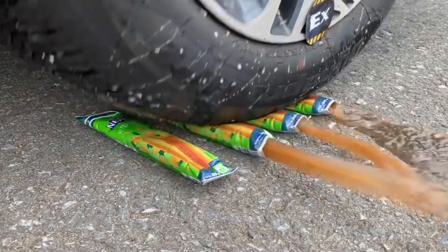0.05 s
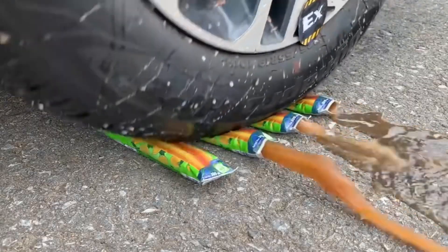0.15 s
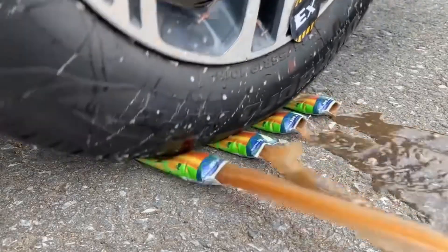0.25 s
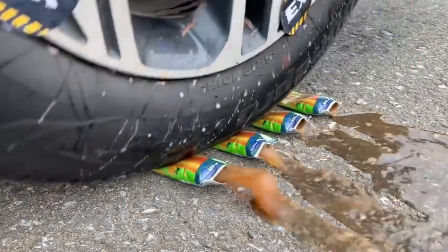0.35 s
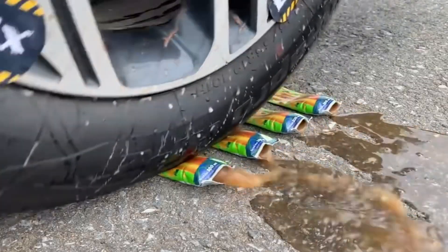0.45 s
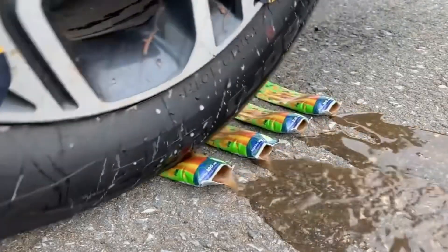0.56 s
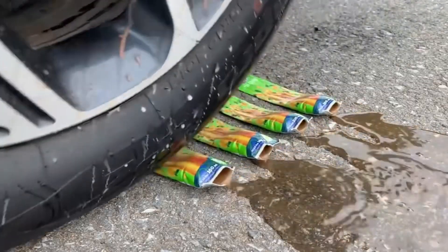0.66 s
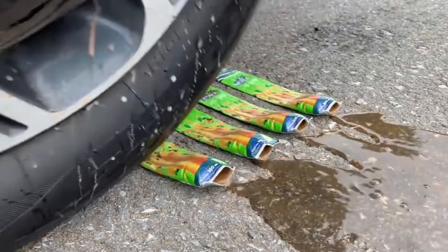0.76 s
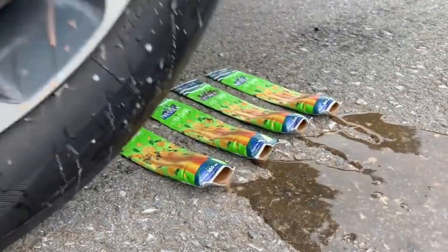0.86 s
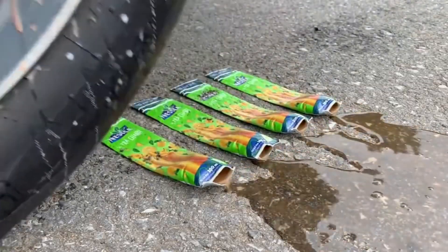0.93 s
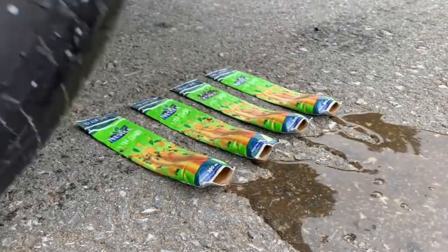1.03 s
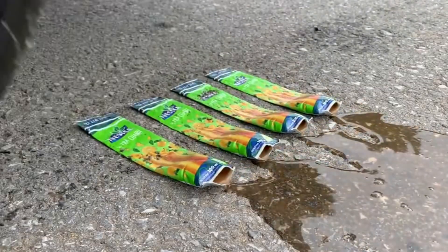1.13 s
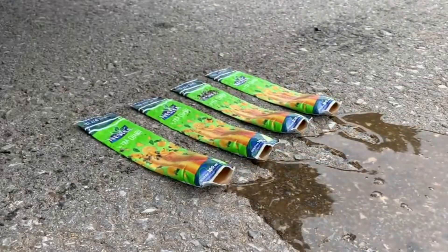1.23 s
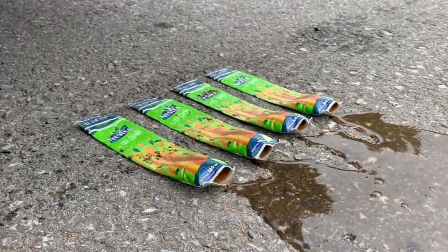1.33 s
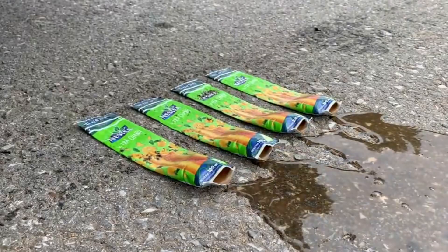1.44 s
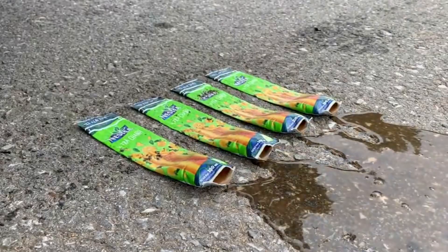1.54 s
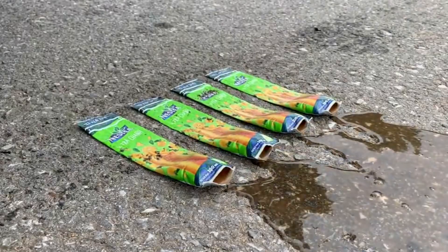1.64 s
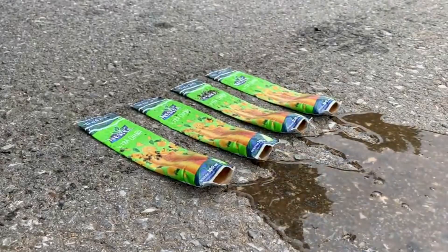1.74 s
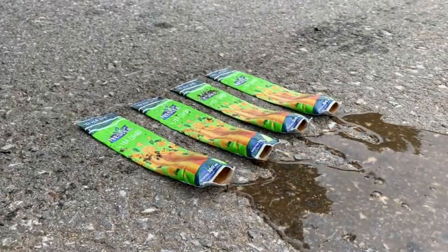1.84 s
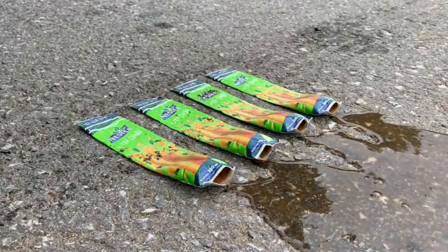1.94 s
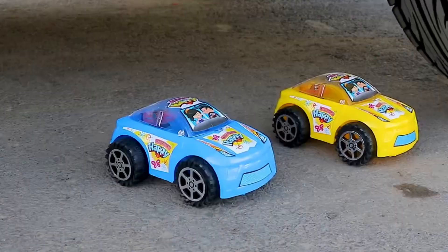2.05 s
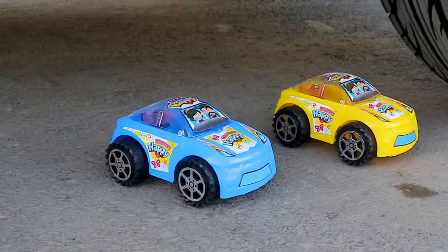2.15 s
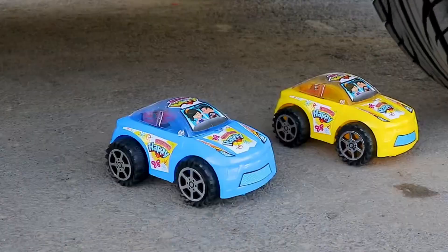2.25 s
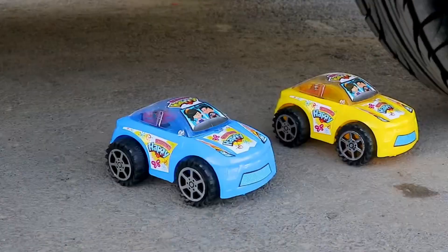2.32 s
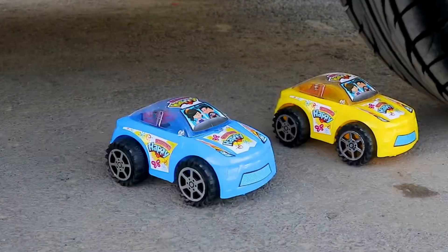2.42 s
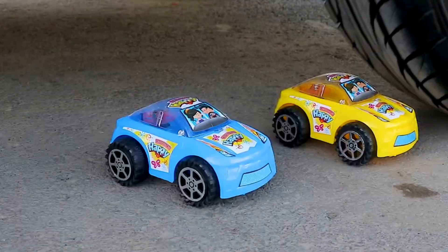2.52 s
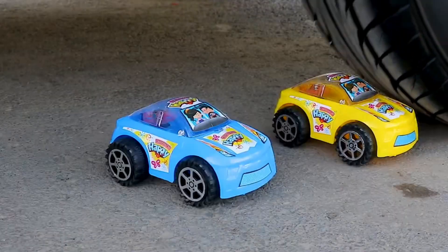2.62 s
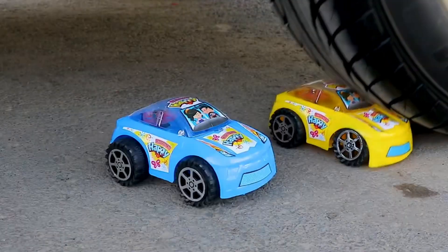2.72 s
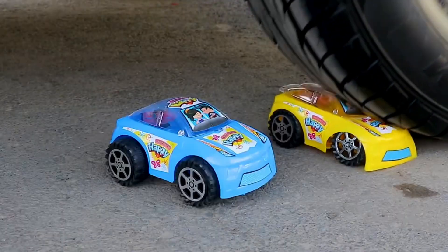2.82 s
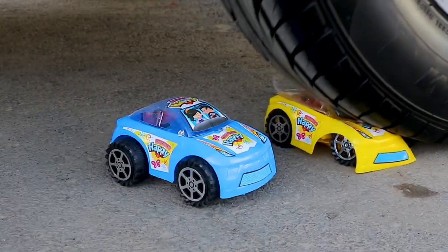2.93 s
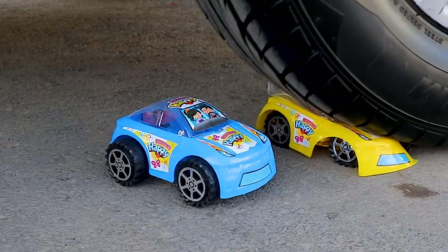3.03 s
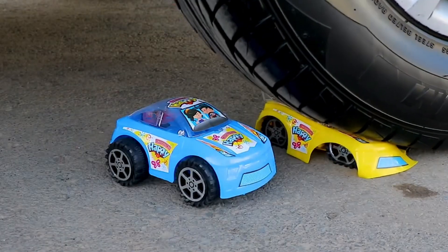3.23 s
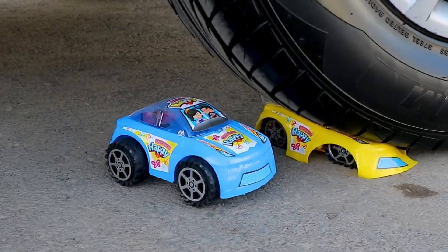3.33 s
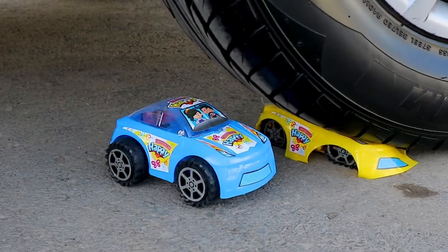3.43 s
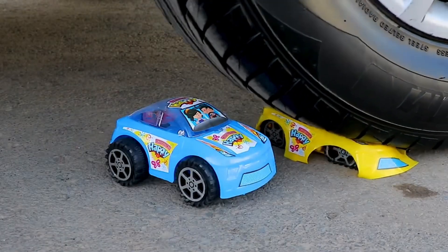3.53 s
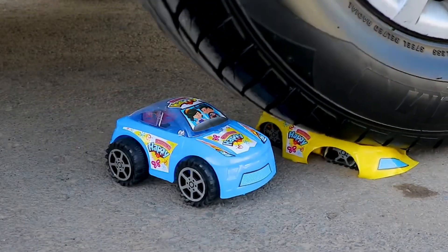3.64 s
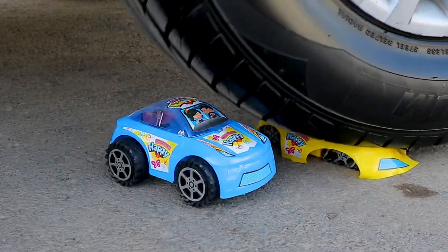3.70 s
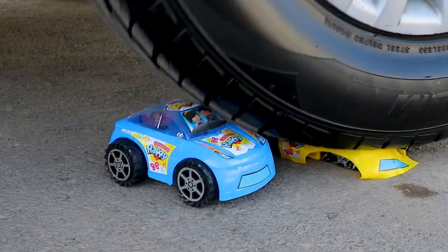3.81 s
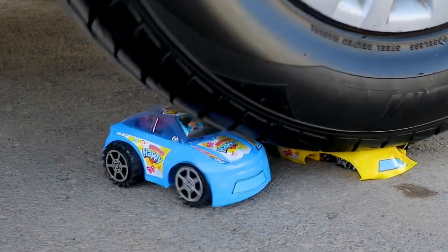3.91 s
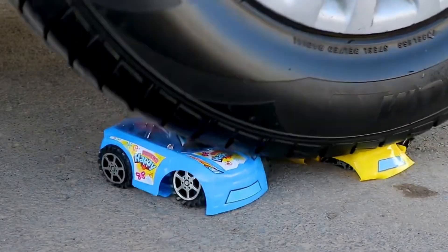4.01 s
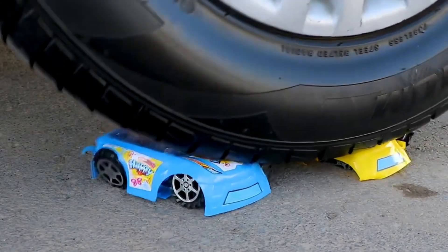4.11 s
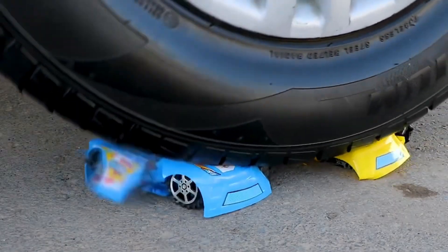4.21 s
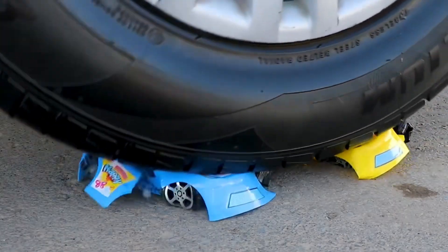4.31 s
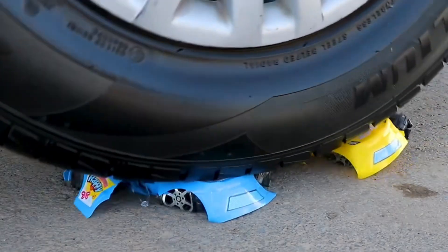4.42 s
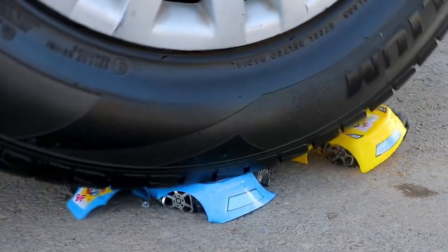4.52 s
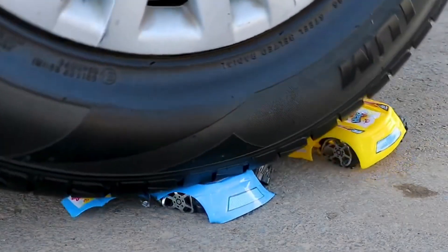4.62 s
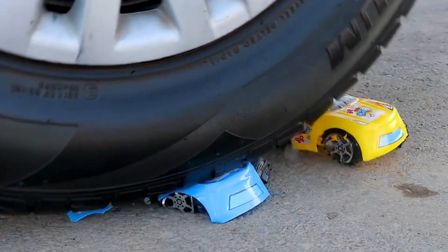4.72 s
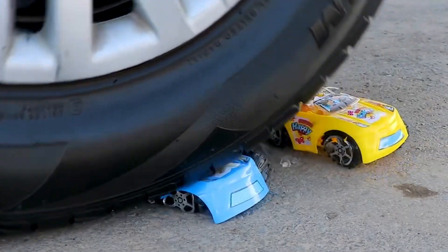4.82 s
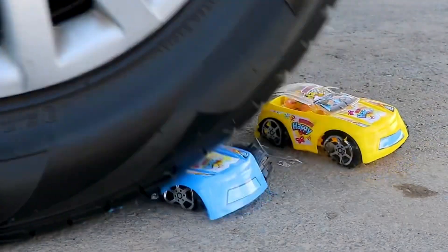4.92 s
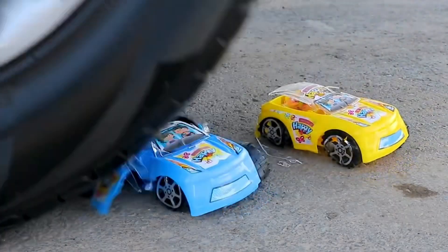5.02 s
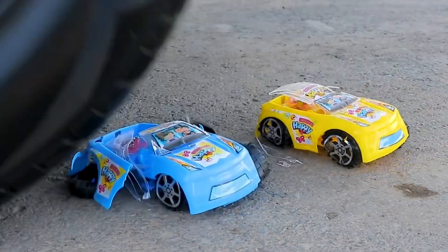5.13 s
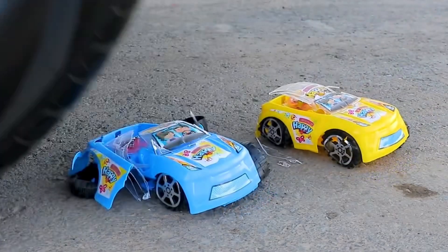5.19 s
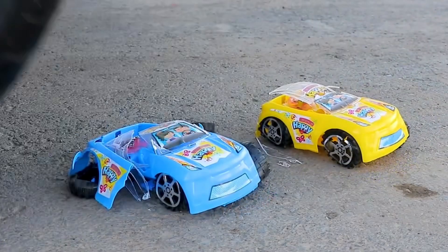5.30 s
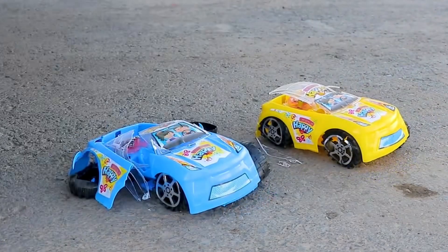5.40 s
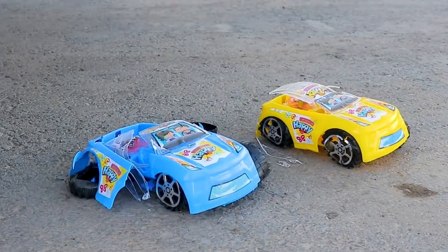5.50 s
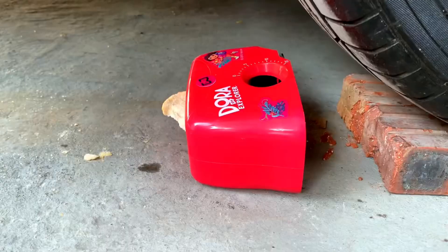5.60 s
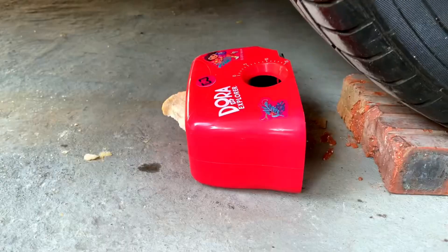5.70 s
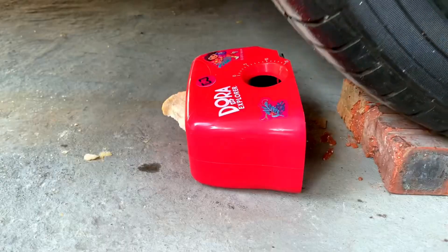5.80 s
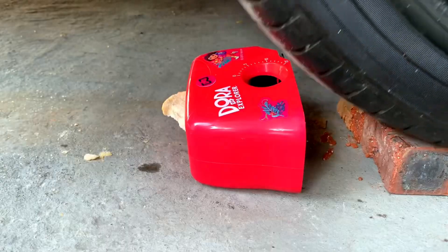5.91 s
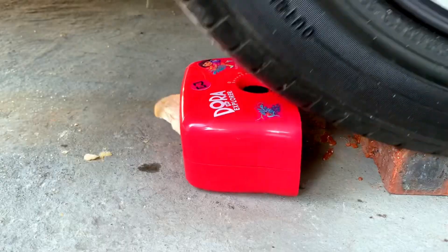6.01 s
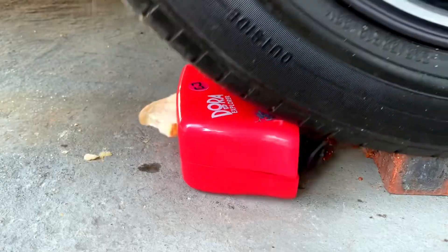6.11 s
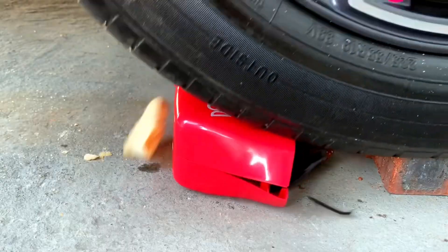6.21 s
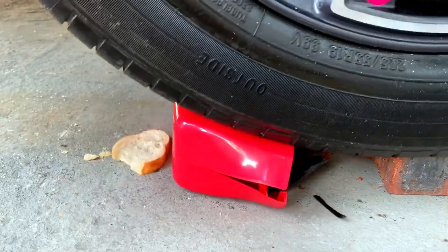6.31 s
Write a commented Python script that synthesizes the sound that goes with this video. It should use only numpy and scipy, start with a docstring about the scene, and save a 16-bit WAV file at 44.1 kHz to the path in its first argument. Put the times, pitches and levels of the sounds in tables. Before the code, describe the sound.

Foil pouches snap and squirt under a rolling tyre, then plastic toys and a thicker box crunch in bouts while an engine idles.

```python
"""A car tyre crushes things

Three short scenes of a slowly rolling tyre, joined by hard cuts, with an idling engine behind.
On a street, foil drink pouches snap, burst and spray. In a yard, two hollow plastic toys crack one
after the other, in mono. In a garage, a thicker plastic box crunches. Each split in the plastic is
a burst of noise that makes the shell ring; many tiny splits together make the crunch."""
import sys
import numpy as np
from scipy import signal
from scipy.io import wavfile
from scipy.ndimage import uniform_filter1d

SR = 44100
rng = np.random.default_rng(int(sys.argv[2]) if len(sys.argv) > 2 else 0)


def log_audio(samples):
    """Write samples as a 16-bit WAV file to the path given in sys.argv[1]."""
    # one column per channel
    frames = np.atleast_2d(samples).T
    # limit to full scale, then quantise
    limited = np.clip(frames, -1, 1)
    pcm = np.round(limited * 32767).astype(np.int16)
    wavfile.write(sys.argv[1], SR, pcm)


N = 280035
GARAGE_START_S = 5.606

# street air with the engine's rumble: f/Hz, relative level/dB
STREET_SPECTRUM = [(25, -15.5), (69, 7), (140, -12.5), (220, -10), (400, -22), (1300, -30), (2200, -29.5),
                   (9000, -52), (15000, -65)]
# cracks of the toys, then of the box: t/s, split level/dB, ring level/dB (both relative)
CRACK_EVENTS = [(2.7671, -2.5, -14.5), (2.7784, 4, -7), (2.818, -11, -22), (2.8275, 4, -22),
                (2.8413, 1.5, -20), (2.871, 6, -10), (2.9096, 1, -18.5), (2.9223, 8, -8),
                (3.0101, -3.5, -19.5), (3.026, -3, -20.5), (3.0705, 5.5, -14), (3.1002, 2, -21.5),
                (3.1192, -1, -16.5), (3.1597, 0, -21.5), (3.1839, -1.5, -12.5), (3.2043, -1.5, -15),
                (3.2506, 0.5, -14.5), (3.384, -7, -56), (3.3965, -9, -23), (3.468, -18.5, -38),
                (3.484, -18, -59), (3.5005, -9.5, -41), (3.5099, -5.5, -55), (3.557, -16.5, -49),
                (3.5735, -9, -28.5), (3.6064, 2.5, -10), (3.6284, -2.5, -11.5), (3.7333, 2, -16.5),
                (3.78, -11, -31.5), (3.8017, -1.5, -13), (3.8258, -1, -15), (3.8552, -3.5, -30),
                (3.8738, 2, -11.5), (3.9362, 5, -9.5), (3.9551, -1, -6), (3.9814, 1, -13),
                (3.9944, 0, -4.5), (4.0196, -5, -15), (4.0562, 6, -9.5), (4.066, 5.5, -6.5),
                (4.084, 4, -11), (4.113, -4, -23.5), (4.126, 4.5, -10), (4.138, -3, -17), (4.1603, -3, -18),
                (4.1764, 2.5, -8), (4.1876, 5, -8.5), (4.251, -3.5, -18.5), (4.2628, 9.5, -11.5),
                (4.2885, 0.5, -10.5), (4.321, -7.5, -26), (4.381, -0.5, -15), (4.403, -10, -26),
                (4.4392, -1.5, -10), (4.466, -2.5, -17), (4.6019, 2, -9.5), (4.6455, -7, -14),
                (4.7115, -17, -24), (4.7188, -5, -16.5), (4.7812, -12, -24.5), (4.806, -6.5, -20),
                (4.8384, -5, -10), (4.8489, 0, -12.5), (4.8947, -1, -13.5), (4.9006, 0.5, -18),
                (4.945, -6, -22), (4.9809, -3, -29.5), (6.0124, -27, -15), (6.0383, -4, -15),
                (6.1145, -1, -12), (6.1673, 4.5, -16.5), (6.2756, 2.5, -23)]
# a shell gives way and crunches until flat: t/s, relative level/dB, fall/(dB per s), end/s
CAVE_INS = [(2.775, -12.5, 102, 2.94), (2.94, -14.5, 19, 2.985), (3.03, -24, 30, 3.17),
            (3.89, -29.5, 6.5, 4.15), (3.6, -15.5, 153, 3.68), (3.74, -31, 2, 3.83),
            (3.96, -18.5, 19.5, 4.05), (4.29, -20, 31, 4.42), (4.5, -32.5, 1, 4.6),
            (4.65, -19.5, 182, 4.68), (4.79, -31, 27, 5.1), (5.96, -13, 21, 6.2), (6.295, -18.5, 62, 6.48)]


def amp(db):
    """Turn decibels into a gain."""
    return 10 ** (np.asarray(db) / 20)


def unit_power(x):
    """Scale a sound to an average power of one."""
    return x / np.sqrt(np.mean(x ** 2) + 1e-20)


def value_at(points, hz):
    """Look up a curve over frequency."""
    f, value = np.transpose(points)
    return np.interp(np.log(hz + 1), np.log(f + 1), value)


def level(curve):
    """Gain per sample, silent outside the curve."""
    s, db = np.transpose(curve)
    return amp(np.interp(np.arange(N) / SR, s, db, -200, -200))


def swells(rows, rise=699.5, stop=551):
    """Gain per sample: each row rises, sinks, then dies away; rates are in dB per s."""
    t, power = np.arange(N) / SR, 0
    for s, db, fall, end in rows:
        before, after, past_end = np.maximum([s - t, t - s, t - end], 0)
        power += amp(db - rise * before - fall * after - stop * past_end) ** 2
    return np.sqrt(power)


def add(mix, s, sound):
    """Mix a sound in, starting at s seconds."""
    part = mix[..., round(s * SR):][..., :sound.shape[-1]]
    part += sound[..., :part.shape[-1]]


def colour(x, spectrum):
    """Filter a sound to the given spectrum, with no ringing ahead of a hit."""
    log_gain = np.log(amp(value_at(spectrum, abs(np.fft.fftfreq(4096, 1 / SR)))))
    taps = np.fft.ifft(np.exp(np.conj(signal.hilbert(log_gain)))).real[None, :2048]
    return signal.oaconvolve(x, taps / np.linalg.norm(taps), axes=1)[:, :N]


def air(spectrum, curve):
    """Background noise with drifting louder patches; left and right share mostly the bass."""
    # how alike the two sides are: f/Hz, likeness (0 to 1)
    likeness = [(100, 0.93), (800, 0.027)]
    hz = np.fft.rfftfreq(1024, 1 / SR)
    a, b, c, d, patches = rng.standard_normal((N // 256 + 5, 513, 5)).T
    patches = uniform_filter1d(patches, size=10, axis=0)
    patches = unit_power(uniform_filter1d(patches, size=12, axis=1))
    same = value_at(likeness, hz)[:, None]
    left = a + 1j * b
    right = same * left + np.sqrt(1 - same ** 2) * (c + 1j * d)
    spectra = np.array([left, right]) * amp(value_at(spectrum, hz)[:, None] + 1.5 * patches)
    noise = signal.istft(spectra, nperseg=1024, noverlap=768)[1][:, :N]
    return level(curve) * unit_power(noise)


def street_air():
    """The low rumble of the street."""
    # street loudness: t/s, level/dB
    loudness = [(0, -33), (.57, -37.5), (.59, -47), (1.4, -44.5), (1.7, -40.5), (2.014, -42)]
    return air(STREET_SPECTRUM, loudness)


def yard_air():
    """A fading hiss and a distant engine, in mono."""
    # yard hiss: f/Hz, relative level/dB
    hiss = [(40, -34), (200, -8), (400, -14.5), (1000, -3), (2000, -3), (6000, -15), (15500, -37.5)]
    # loudness of the hiss and of the engine: t/s, level/dB
    hiss_level = [(2.014, -41.5), (2.7, -47), (3.298, -51), (5.2, -67), (5.604, -69.5)]
    engine_level = [(2.019, -64.5), (5.606, -68)]
    return air(hiss, hiss_level)[0] + air(STREET_SPECTRUM, engine_level)[0]


def garage_air():
    """The deep, louder rumble of the garage."""
    # garage rumble: f/Hz, relative level/dB
    rumble = [(15, -31), (25, -5), (110, -7.5), (227, -17.5), (703, -27.5), (1270, -35), (15500, -53.5)]
    # its loudness: t/s, level/dB
    loudness = [(5.606, -30), (6.35, -27)]
    return air(rumble, loudness)


def engine_hum(width_hz=3.7):
    """Low engine tones that waver at random."""
    # engine tones and a faint yard tone: start/s, end/s, f/Hz, start level/dB, end level/dB
    tones = [(0, 1.4, 86.7, -47, -63), (.35, 2.015, 170.8, -45, -65), (2.018, 2.43, 93.8, -45.5, -54),
             (5.199, 5.46, 364, -63.5, -68.5), (5.608, 6, 109, -34, -32.5), (6.02, 6.27, 198.5, -26.5, -26)]
    out, decay = np.zeros(N), np.exp(-np.pi * width_hz / SR)
    for start, end, hz, db, end_db in tones:
        t = np.arange(0, end - start, 1 / SR)
        noise = rng.standard_normal((2, N)).T[:len(t)] @ [1, 1j]
        drift = signal.lfilter([1], [1, -decay], noise)
        tone = ((1.7 + drift / np.std(drift)) * np.exp(2j * np.pi * hz * t)).real
        add(out, start, amp(np.linspace(db, end_db, len(t))) * unit_power(tone))
    return out


def with_echoes(x, t60, echo_db):
    """Add echoes from the ground, tyre and car's underside; they fade 60 dB in t60 seconds."""
    taps = np.zeros((len(x), 12000))
    delays = np.arange(100, 11960, 20) + rng.integers(0, 20, (len(x), 593))
    strengths = rng.choice([-1., 1.], delays.shape) * amp(-60 * delays / SR / t60)
    np.put_along_axis(taps, delays, strengths, 1)
    taps = signal.lfilter([1], [1, -.4], taps)  # duller than the direct sound
    return x + amp(echo_db) * signal.oaconvolve(x, taps / np.linalg.norm(taps[0]), axes=1)[:, :N]


def crackle(gain, spectrum, per_s, spread_db, t60, channels):
    """Tiny splits or drops as puffs of noise; low, middle and high ones come at their own moments."""
    out = np.zeros((channels, N))
    fade = amp(-60 * np.arange(2000) / SR / t60)
    for band_hz in ((30, 1800), (2200, 6500), (6000, 18000)):
        size = amp(spread_db * np.minimum(rng.exponential(1, N), 4))
        hits = size * (rng.random(N) < per_s / SR)
        power = signal.oaconvolve(hits ** 2, fade ** 2)[:N]
        puffs = np.sqrt(abs(power)) * rng.standard_normal((channels, N))
        out += signal.lfilter(*signal.butter(1, band_hz, "band", fs=SR), puffs)
    return gain * unit_power(colour(out, spectrum))


def juice_spray():
    """Juice jets out of the burst pouches, then trickles on the road."""
    # hiss of the juice: f/Hz, relative level/dB
    hiss = [(600, -12), (2500, 0), (4500, -7.5), (9000, -3), (15000, -14)]
    # jets running down: t/s, level/dB, fall/(dB per s), end/s
    jets = [(.15, -36, 30, .19), (.316, -36, 28, 0.354)]
    # running juice: t/s, level/dB
    trickle = [(0, -48.5), (.46, -47.5), (.52, -30), (.578, -46), (.584, -62), (1.4, -66)]
    gain = np.hypot(swells(jets, rise=1500), level(trickle))
    return crackle(gain, hiss, per_s=800, spread_db=4.2, t60=0.023, channels=2)


def foil_snaps(t60=0.03):
    """The pouch foil snaps with a short, rough ring of four nearby tones."""
    # snaps: t/s, level/dB, f/Hz
    snaps = [(0.1058, -21, 2540), (0.2308, -11.5, 2060), (0.3528, -15, 3260), (0.5053, -16, 2930)]
    out, t = np.zeros((2, N)), np.arange(3000) / SR
    for s, db, hz in snaps:
        detune, phase = rng.random((2, 2, 4, 1))
        ring = np.sin(2 * np.pi * (hz * (0.827 + 0.37 * detune) * t + phase)).sum(1) / 2
        add(out, s, amp(db - 60 * t / t60) * ring * np.minimum(t / 0.0013, 1))
    return out


def thumps():
    """A pouch bursts or the tyre drops: a push of air whose pitch falls fast."""
    # pushes of air: t/s, level/dB, start f/Hz, end f/Hz, time to fade 60 dB/s
    pushes = [(0.149, -27.5, 1130, 108, 0.068), (0.321, -21.5, 795, 83.6, 0.44), (3.952, -8, 60, 35, 0.055)]
    out, t = np.zeros(N), np.arange(12000) / SR
    for s, db, start_hz, end_hz, t60 in pushes:
        hz = end_hz + (start_hz - end_hz) * np.exp(-t / 0.0043)
        add(out, s, amp(db - 60 * t / t60) * np.sin(2 * np.pi * np.cumsum(hz) / SR))
    return out


def shell_groans(width_hz=80, slips_per_s=500):
    """Uneven slips make a hollow shell ring, higher as it is squeezed."""
    # groans: start/s, end/s, start f/Hz, end f/Hz, level/dB
    groans = [(2.773, 2.883, 733, 1050, -17.5), (5.954, 6.042, 535, 640, -16.5)]
    out, decay = np.zeros(N), np.exp(-np.pi * width_hz / SR)
    for start, end, hz, end_hz, db in groans:
        count = round((end - start) * SR)
        size, chance = rng.random((2, N))[:, :count]
        slips = size * (chance < slips_per_s / SR)
        glide = np.exp(2j * np.pi * np.cumsum(np.linspace(hz, end_hz, count)) / SR)
        ring = glide * signal.lfilter([1], [1, -decay], slips / glide)
        add(out, start, amp(db) * unit_power(ring.real) * signal.windows.tukey(count, .5))
    return out


def cracks(rows, spectrum, t60, ring_t60=0.031):
    """A split runs through the plastic as a stuttering burst and shakes the panels near it."""
    # the shell's own tones: f/Hz, relative level/dB
    shell_tones = [(715, 0.5), (815, 1.4), (1035, 6.5), (1220, 5.6), (1400, 5.5), (1650, 4.6)]
    # pitch of the panel under the tyre, which rings most: t/s, f/Hz
    panel_pitch = [(2.75, 800), (3.2, 1030), (3.5, 1450), (3.65, 875), (5.0, 861), (5.95, 562), (6.2, 1190)]
    split, ring, t = np.zeros((1, N)), np.zeros(N), np.arange(6000) / SR
    hz, tone_db = np.transpose(shell_tones)[:, :, None]
    for s, split_db, ring_db in rows:
        panel_hz = np.interp(s, *np.transpose(panel_pitch))
        stutter, noise = rng.standard_normal((2, len(t)))
        detune, damping = rng.random((2, len(hz), 1))
        length, rise, pitch = rng.random(3)
        fade_s = t60 * (.6 + .8 * length) * amp(.3 * split_db)  # small splits are short
        shape = amp(-60 * t / fade_s) + .05 * amp(-60 * t / (5 * fade_s))  # break, then settle
        shape *= amp(3.5 * unit_power(uniform_filter1d(stutter, size=50)))
        shape *= np.minimum(t / (.0003 + .0015 * rise ** 2), 1)
        burst = noise * shape
        # each broken piece has a pitch of its own
        piece = signal.lfilter(*signal.iirpeak(4200 * 2 ** (0.6 * pitch), 4, SR), burst)
        snap = signal.lfilter(*signal.butter(2, 1.05 * panel_hz, "high", fs=SR), burst + 1.4 * piece)
        add(split, s, amp(split_db) * snap / abs(snap).max())
        start_db = tone_db - 11 * abs(np.log2(hz / panel_hz)) - 6 * damping
        fades = amp(start_db - 60 * t * hz / panel_hz / ring_t60)  # higher tones die sooner
        tones = fades * np.sin(2 * np.pi * hz * (.86 + .28 * detune) * t)
        shaken = signal.oaconvolve(tones.sum(0), burst[:300])[:len(t)]
        add(ring, s, amp(ring_db) * shaken / np.std(shaken[:441]))
    return colour(split, spectrum) + ring


def plastic_toys():
    """Small shells crack with little bass; the air inside the tyre answers each blow."""
    # breaking toy plastic: f/Hz, relative level/dB
    spectrum = [(80, -39.5), (500, -5), (900, 5), (3000, -3.5), (5200, -4), (11000, -11.5), (16000, -14)]
    toys = cracks([row for row in CRACK_EVENTS if row[0] < GARAGE_START_S], spectrum, t60=0.02)
    gain = swells(CAVE_INS) * (np.arange(N) / SR <= GARAGE_START_S)
    toys += crackle(gain, spectrum, per_s=600, spread_db=5.6, t60=0.013, channels=1)
    cavity = signal.iirpeak(215, 1.5, SR)
    tyre = signal.lfilter(*cavity, signal.lfilter(*cavity, toys))
    shells = signal.lfilter(*signal.butter(4, 520, "high", fs=SR), toys)
    return shells + amp(-7) * tyre


def plastic_box():
    """A thicker box cracks and crunches flat; its bass reaches both sides alike."""
    # breaking box plastic: f/Hz, relative level/dB
    spectrum = [(150, -23), (600, 5.5), (3000, -5), (8400, -8.5), (16000, -9.5)]
    box = cracks([row for row in CRACK_EVENTS if row[0] > GARAGE_START_S], spectrum, t60=0.017)
    gain = swells(CAVE_INS) * (np.arange(N) / SR > GARAGE_START_S)
    box = box + crackle(gain, spectrum, per_s=600, spread_db=4.0, t60=0.025, channels=2)
    return box + signal.lfilter(*signal.butter(1, 1300, fs=SR), box[::-1] - box) / 2


def scene():
    """Street, yard and garage, one after another."""
    street = street_air() + juice_spray()
    yard = with_echoes(plastic_toys(), t60=0.15, echo_db=-13) + yard_air()
    garage = with_echoes(plastic_box(), t60=0.29, echo_db=-6.5) + garage_air()
    return street + yard + garage + engine_hum() + foil_snaps() + thumps() + shell_groans()


def record(dry):
    """Round off the loudest cracks, then cut the highest treble."""
    clipped = np.tanh((1.1 * abs(dry)) ** 4) ** .25 * np.sign(dry) / 1.1
    lowpass = signal.firwin(511, 15900, window=("kaiser", 9), fs=SR)
    return signal.oaconvolve(clipped, lowpass[None], "same")


dry = scene()
out = record(dry)
log_audio(out)
```